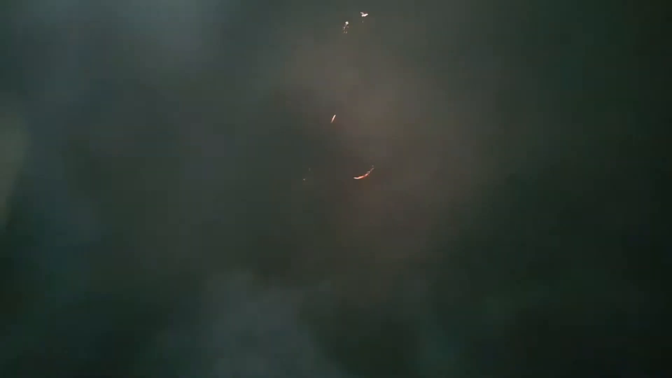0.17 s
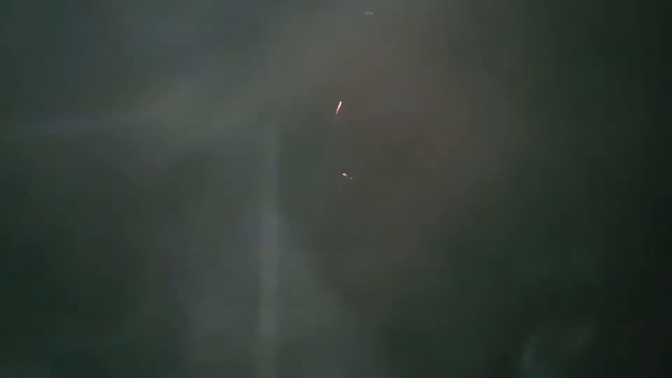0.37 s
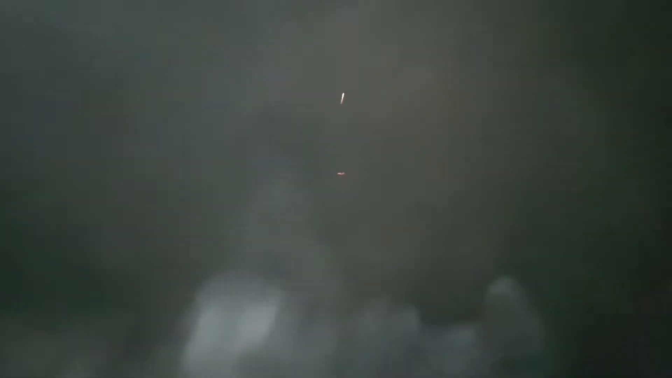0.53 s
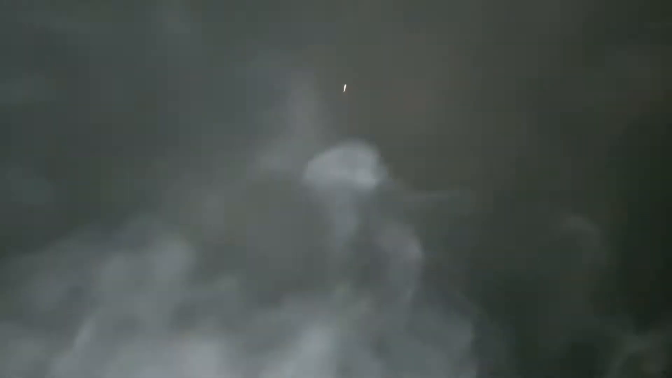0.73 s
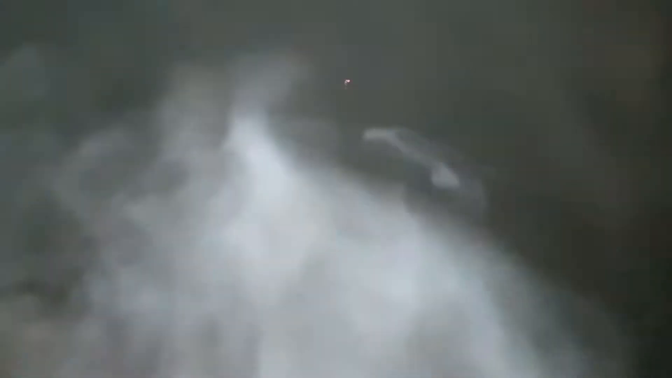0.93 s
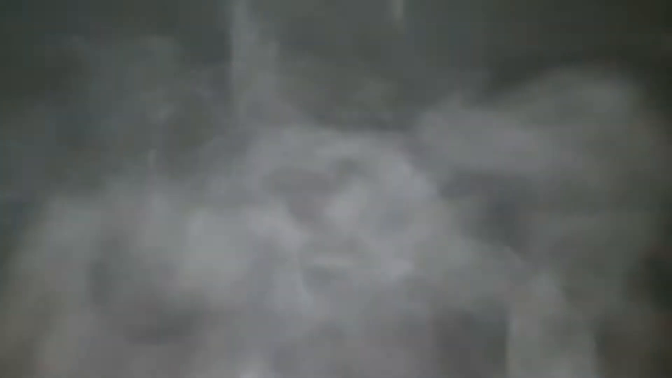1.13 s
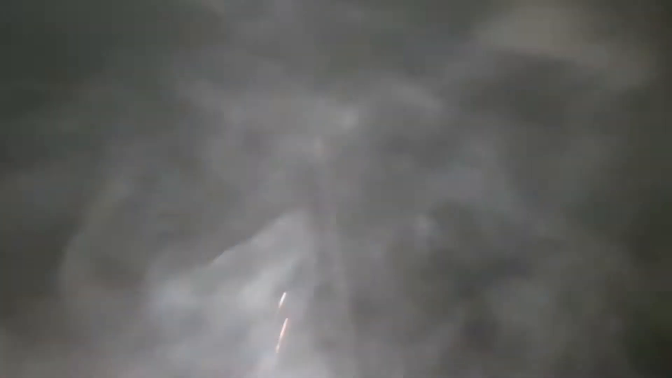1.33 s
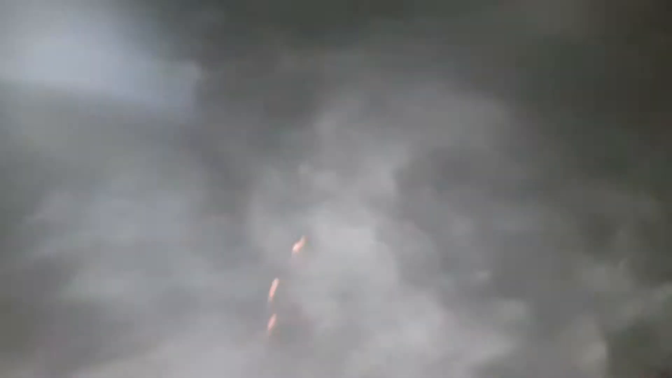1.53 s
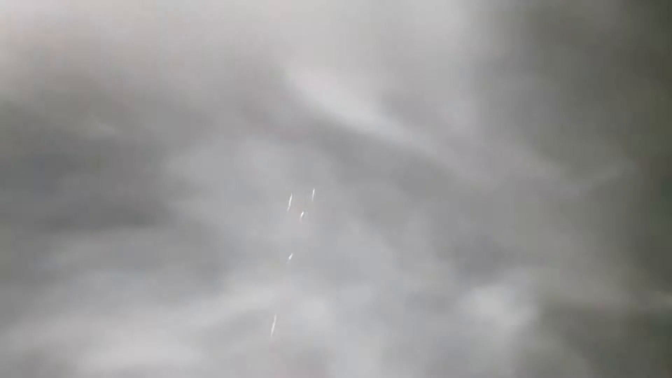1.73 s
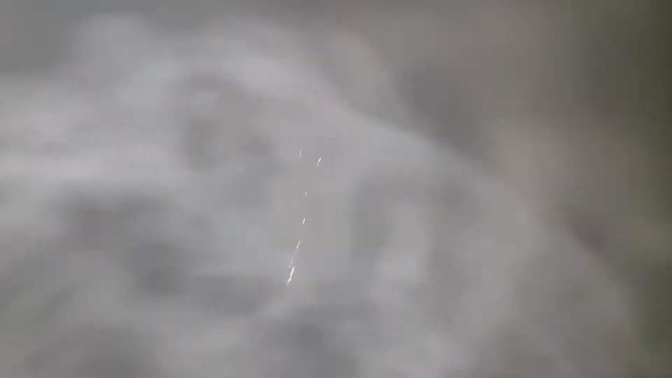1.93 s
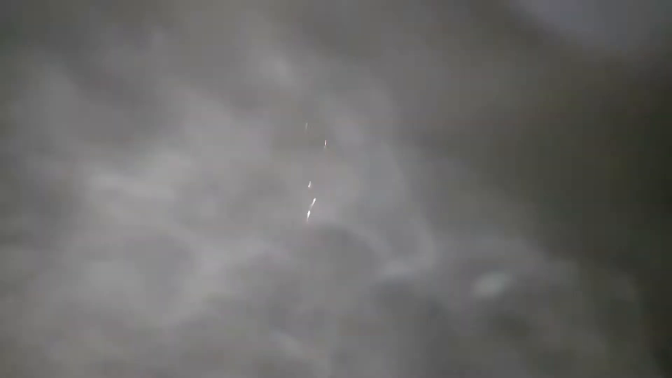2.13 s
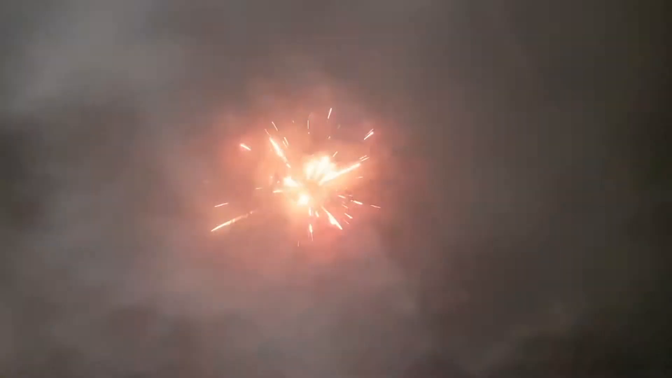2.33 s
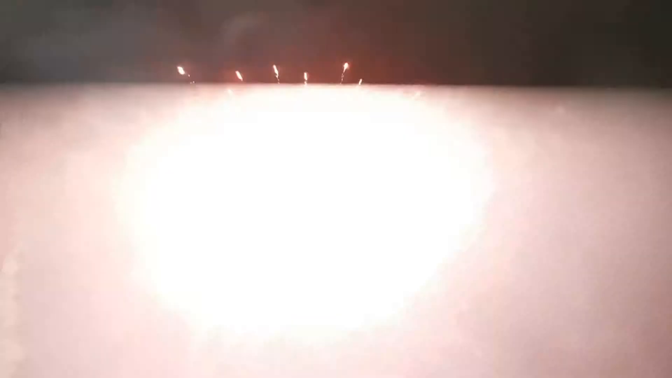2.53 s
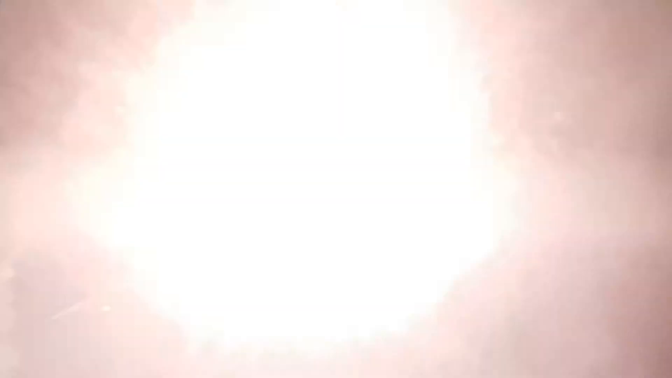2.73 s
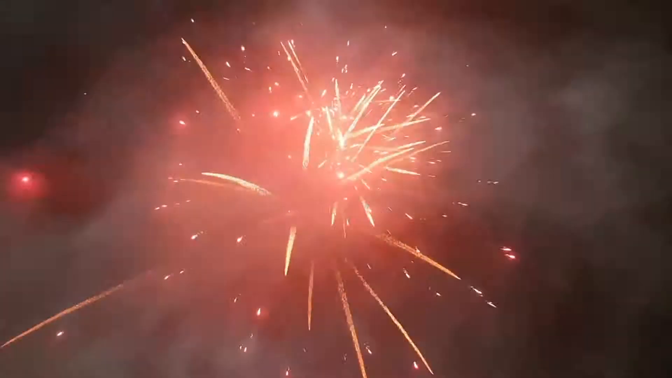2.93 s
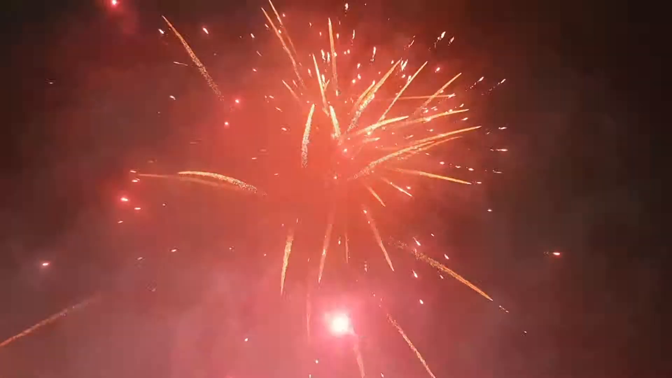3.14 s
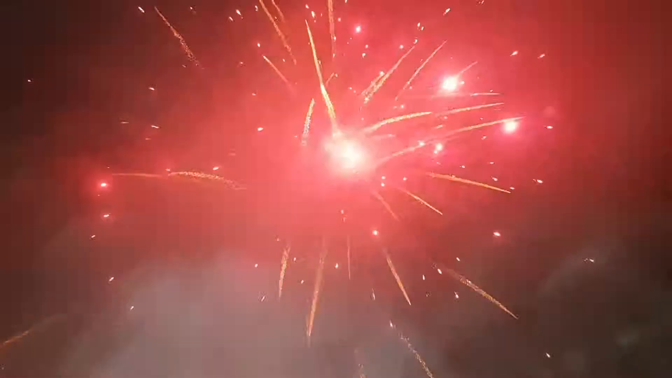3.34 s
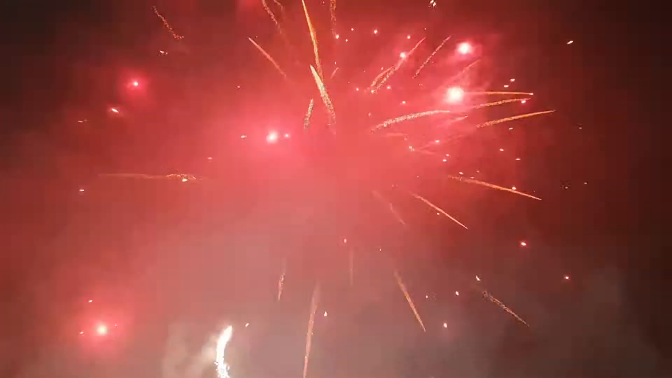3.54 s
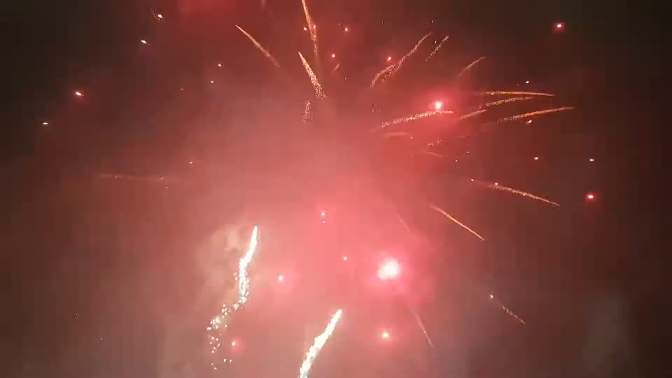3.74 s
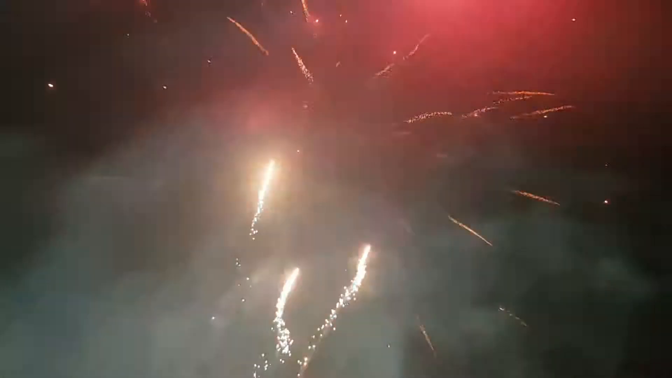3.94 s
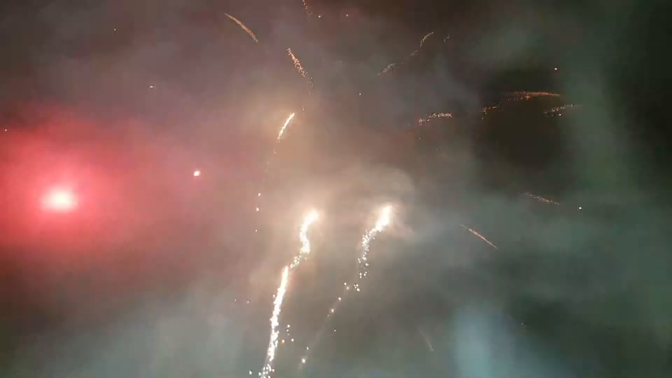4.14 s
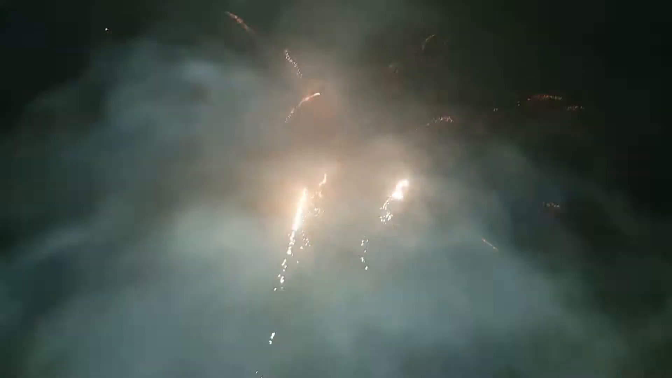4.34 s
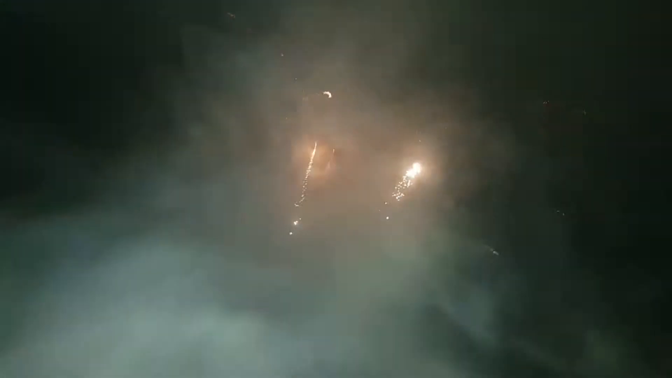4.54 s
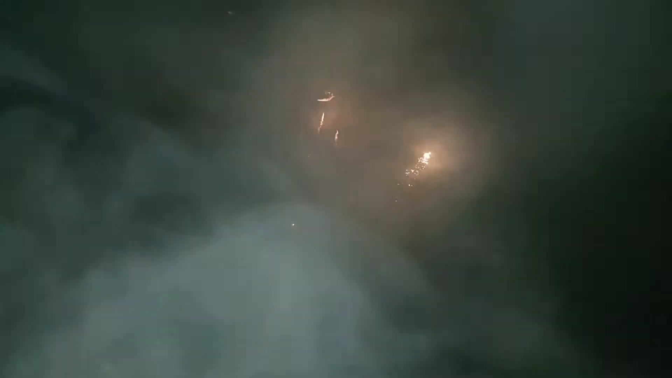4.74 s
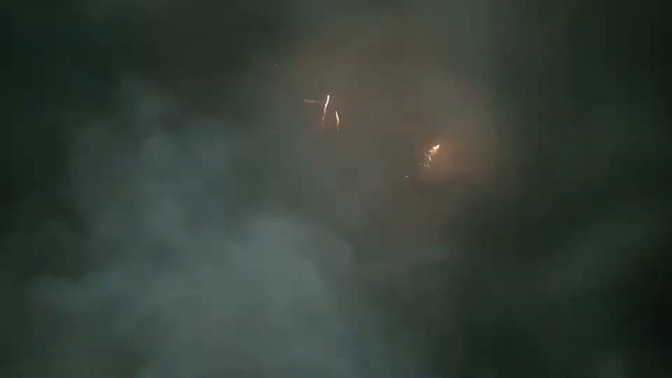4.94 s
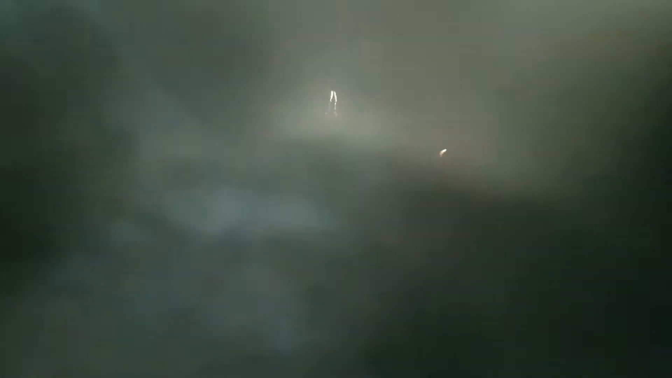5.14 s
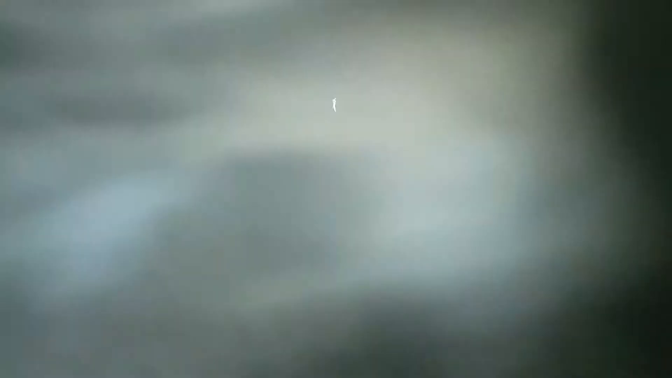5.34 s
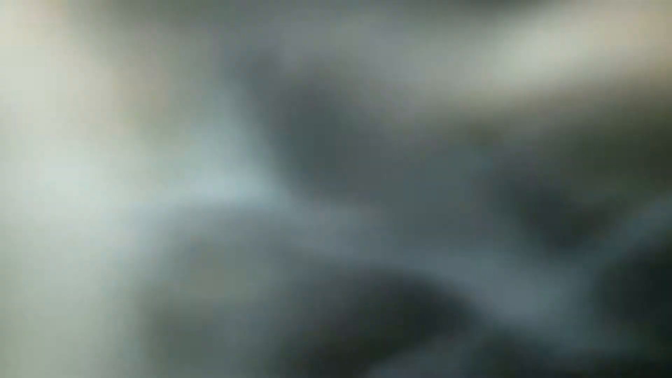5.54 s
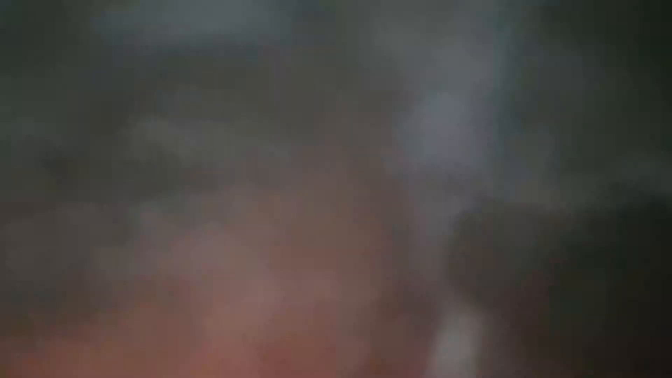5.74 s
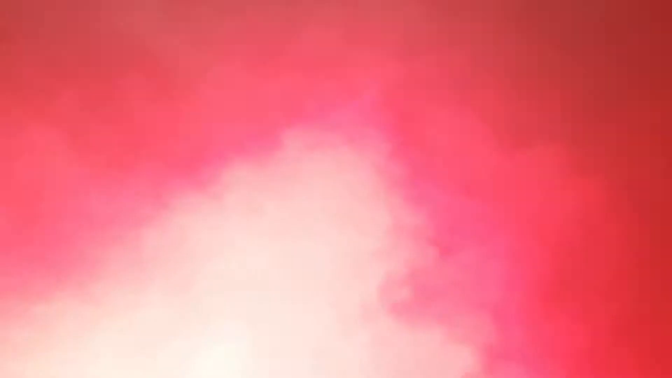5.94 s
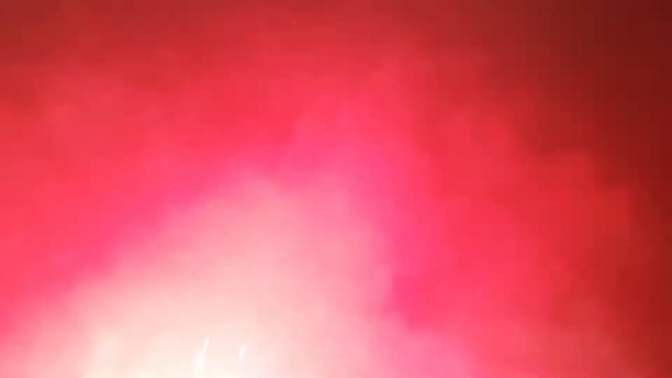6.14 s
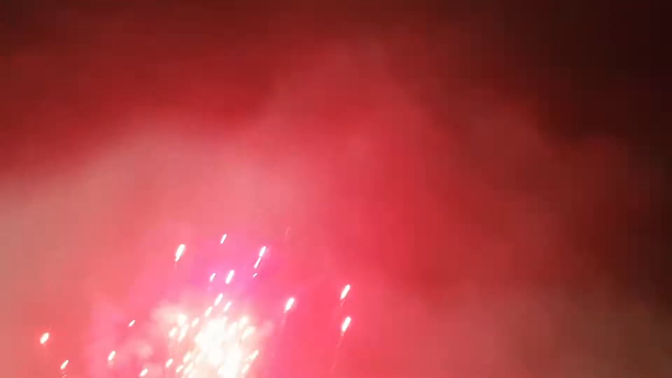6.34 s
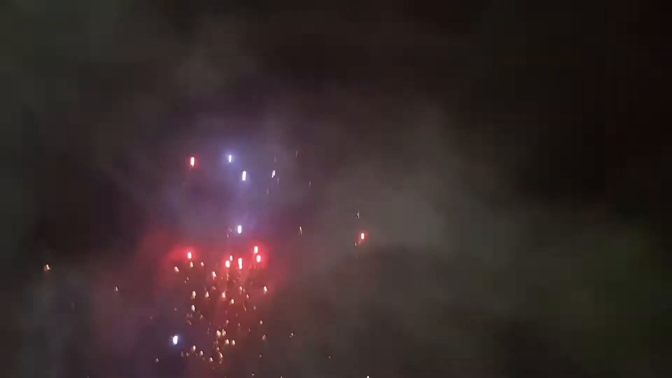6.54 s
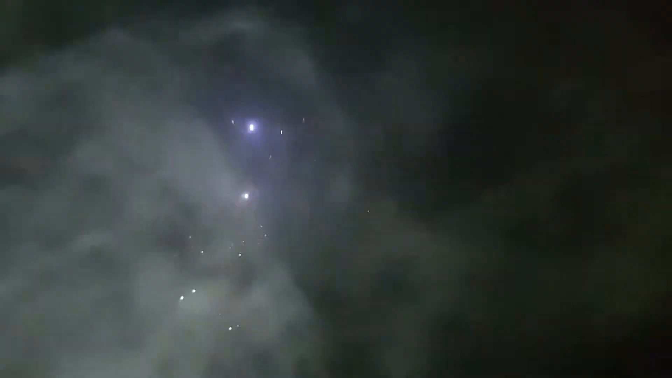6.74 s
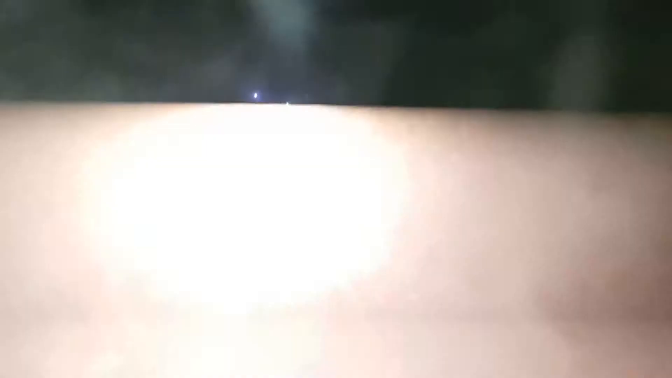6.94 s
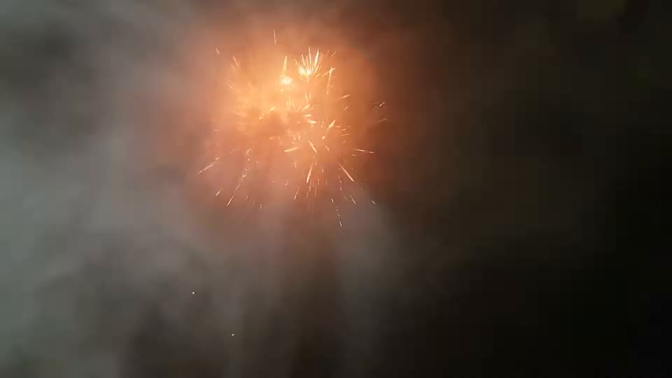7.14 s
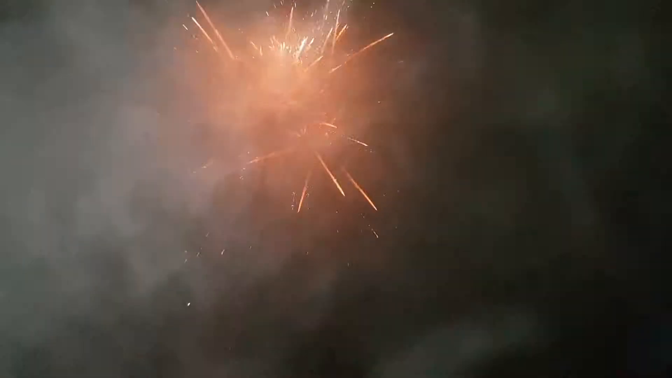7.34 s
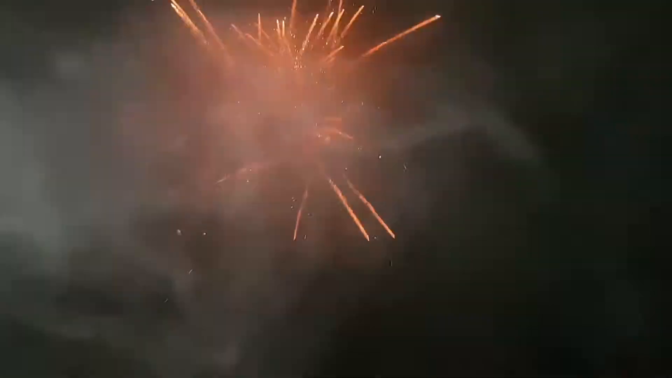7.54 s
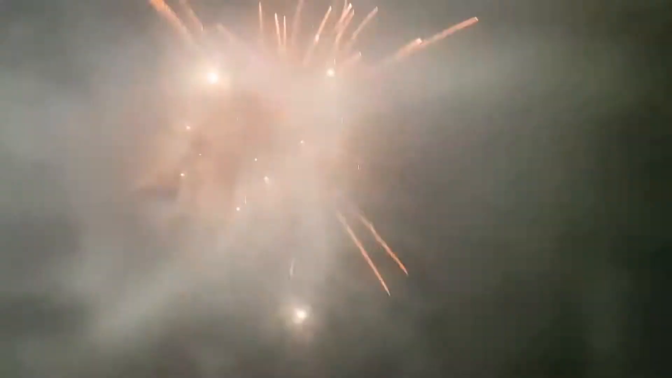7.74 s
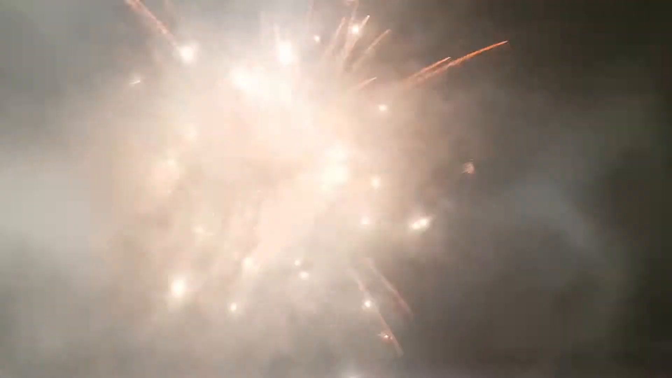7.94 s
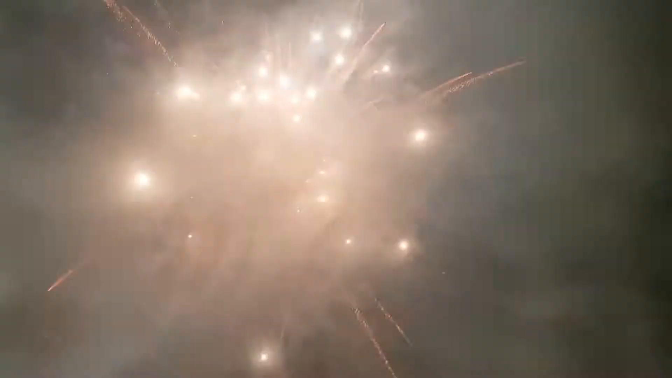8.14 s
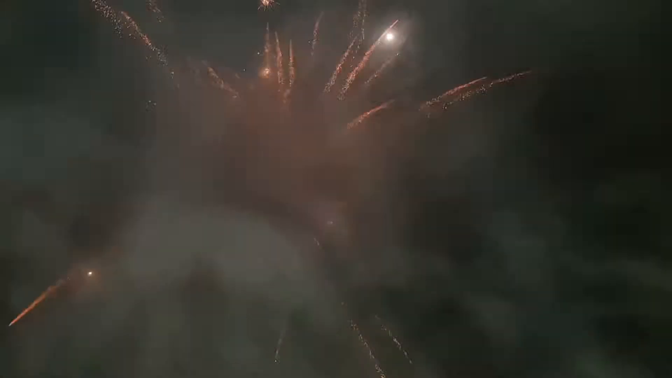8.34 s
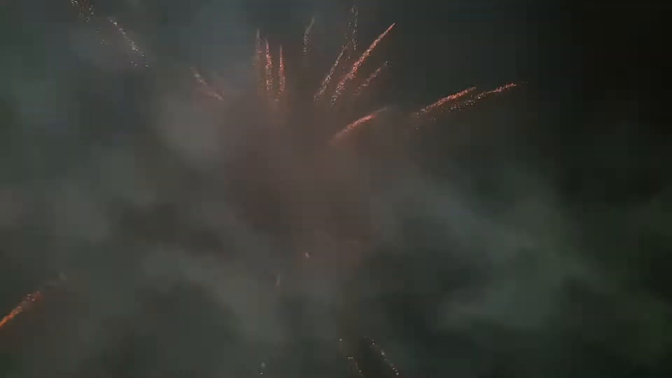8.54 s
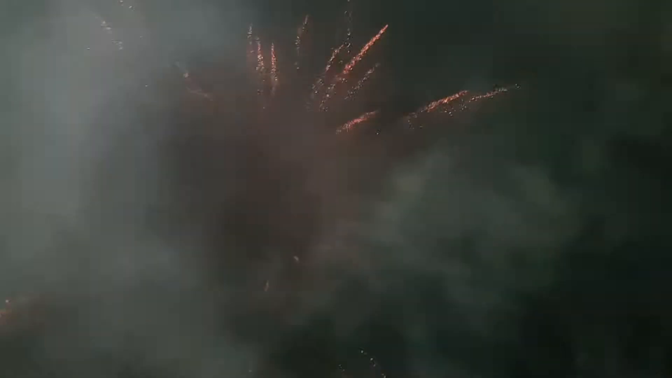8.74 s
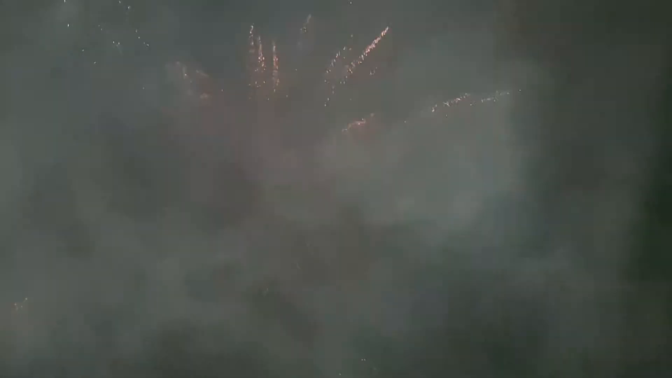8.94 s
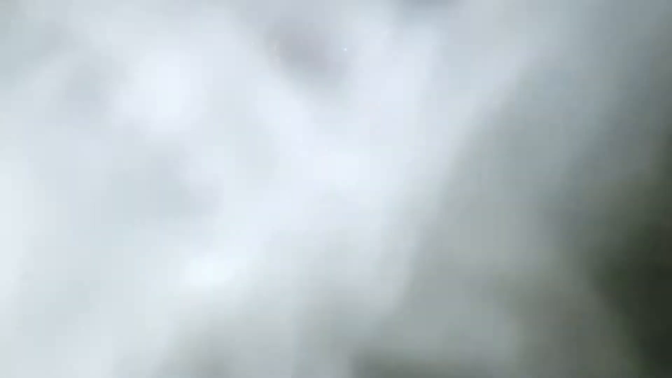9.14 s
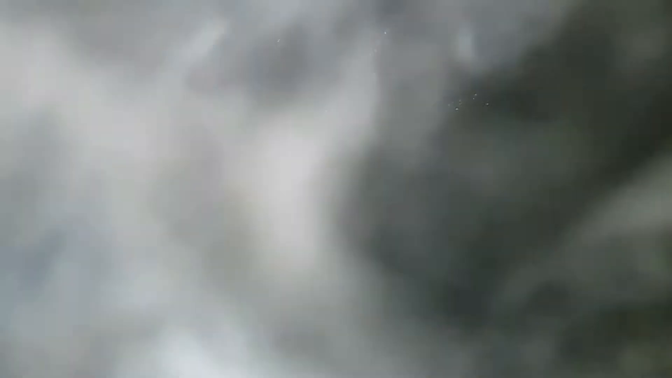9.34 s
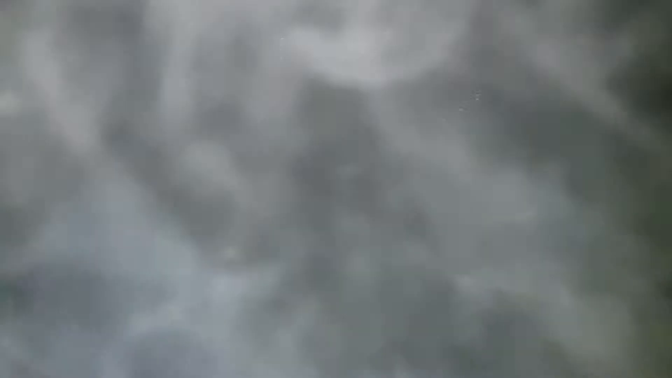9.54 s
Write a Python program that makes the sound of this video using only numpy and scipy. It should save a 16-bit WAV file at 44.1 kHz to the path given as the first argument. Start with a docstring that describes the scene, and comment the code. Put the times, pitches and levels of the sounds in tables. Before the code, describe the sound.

Outdoors at night, distant whistling fireworks sink in pitch before a nearby cake thumps out six shots. Shells crack sharply overhead, then new whistlers shriek upward and drop in pitch. A very rapid volley follows, then more loud bursts and a dense sizzling crackle. Reports overload the close microphone and roll around the neighbourhood, leaving faint hiss.

```python
"""Whistlers already in the air sink in pitch, then a firework cake fires close by, outdoors at night.
Tubes thump in volleys as pressure pulses with gas noise, shells burst overhead and slap back off the ground.
More whistlers climb away as harmonic tones with exhaust hiss, and a cloud of stars crackles as random pops.
The reports overload the microphone and roll away over the neighbourhood in decaying noise; a faint hiss remains."""
import sys
import numpy as np
from scipy import signal
from scipy.fft import rfft, irfft, next_fast_len
from scipy.io import wavfile
from scipy.ndimage import uniform_filter1d

SR = 44100
rng = np.random.default_rng(int(sys.argv[2]) if len(sys.argv) > 2 else 0)


def waveform_to_disk(signal):
    """Save audio, clipped to [-1, 1], as 16-bit WAV at the path in sys.argv[1]."""
    frames = np.transpose(np.atleast_2d(signal))
    scaled = np.clip(frames, -1, 1) * 32767
    samples = np.round(scaled).astype(np.int16)
    wavfile.write(sys.argv[1], SR, samples)


N = 426888
TIME = np.arange(N) / SR
RIGHT_LAG_S = 3 / SR   # extra travel time to the right microphone port

# Whistling tubes. Each row: lit in s, fuel spent in s, silent in s, first pitch in Hz before the swoop,
# pitch of the spent tube in Hz, pitch after the last bend in Hz, lateness of that bend (1 = even),
# dip of the dying note in Hz, level far away in dB, odd partials of the burnt-down tube in dB.
WHISTLER_COURSES = [(-1.23, .63, .92, 1540, 1208, 1240, .8, 0, -30.5, 2),
                    (-1.24, .24, .89, 1750, 1278, 1315, 2.5, 0, -31, -1),
                    (-1.27, -.09, 1.22, 1730, 1226, 1305, 1.6, 0, -34, -3),
                    (3.22, 4.97, 5.62, 1760, 1126, 1225, .45, 215, -28.5, -9),
                    (3.385, 4.75, 5.6, 1760, 1222, 1410, 1, 0, -33.5, -7),
                    (3.53, 5.0, 5.5, 1680, 1210, 1385, 3, 0, -31.5, -3),
                    (3.77, 4.78, 5.5, 1640, 1266, 1175, 1.4, 0, -30.5, 7)]
# Lift charges in the tubes, and one shell bursting low at 5.784 s that is sounded like them. # Each row: start
# in s, blast in dB, typical overpressure in ms, gas crack in dB, echo in dB (relative levels).
LIFT_CHARGES = [(0.8535, 1.5, 1.2, 1.5, 1), (0.9972, -1, 2.7, -7.5, -7), (1.0739, -2.5, 0.52, -6, -10.5),
                (1.219, -1, 0.69, -3, -6), (1.3688, 2, 0.55, -3.5, -8.5), (1.517, -2, 0.84, -0.5, -7.5),
                (3.1228, -6, 2.4, -3, -11.5), (3.1941, -5, 1.4, -7, -15.5), (3.3372, -5, 0.59, -10, -18.5),
                (3.495, -6, 0.41, -18, -19), (3.6129, -8, 0.63, -10.5, -21.5),
                (3.7496, -6, 0.73, -16, -18.5), (5.612, 1, 1.5, 0, 0.5), (5.6493, -1, 1.14, -5, -3),
                (5.6865, 2, 1.3, -6.5, -5), (5.7332, 1, 0.52, -9, -5.5), (5.7627, -2, 0.52, -6, -9),
                (5.784, -1, .5, -7, -8), (5.809, -4, 0.37, -9, -12), (5.8396, -3, 0.38, -5, -9.5),
                (5.8801, -6.5, 1.7, -4.5, -10.5)]
# Shells bursting overhead. Each row: start in s, blast in dB, typical overpressure in ms,
# crack in dB, echo in dB (relative levels).
SHELL_BURSTS = [(2.3325, 15.5, 0.45, 0.5, 1), (2.59, 13, 0.61, -2, 0.5), (2.7224, 12.5, 0.32, -5, -4),
                (2.9195, 5, 0.8, -4, -1), (2.9333, 12, 0.31, -8, -18), (3.0022, 14, 0.3, -4, -2),
                (7.111, 17, 0.42, 0.5, -0.5), (7.1363, 4, 1, -7, 1), (7.1802, 9, 0.48, -3, 0.5),
                (7.2571, 10, 0.47, -3.5, -6.5), (7.2819, 4.5, 0.65, -8, -4), (7.288, 7.5, 0.55, -10, -3.5),
                (7.5856, 12.5, 0.53, -2.5, 2), (7.8718, 15, 0.37, -11, -4.5), (8.042, 7, 0.56, -10, -5),
                (8.1641, 3, 1.1, -12, -11), (8.2864, 4.5, 1, -7.5, -5), (8.6721, 8, 0.4, -6.5, -1.5)]
# Spectrum of the scattered echoes from above. Each row: frequency in Hz, relative level in dB per Hz.
SKY_SCATTER_COLOUR = [(24, -58), (40, -10.5), (124, -8), (199, -3), (422, -1), (503, -3), (570, 1),
                      (873, -17), (1300, -14.5), (3560, -25.5), (4240, -26), (7360, -26), (8550, -37),
                      (13800, -24.5), (16000, -44)]
# Spectrum of the crackling stars. Each row: frequency in Hz, relative level in dB per Hz.
STAR_COLOUR = [(150, -11), (500, -2.5), (900, -0.5), (1300, 3.5), (2200, 0), (3500, 1.5), (7000, -5),
               (9000, -13.5), (13000, -12), (16000, -21)]


def from_db(db):
    """Logarithmic level: 20 dB is a tenfold amplitude."""
    return 10 ** (np.asarray(db) / 20)


def rms_one(x):
    """Normalisation: equal mean power, an rms of one over all channels."""
    return x / np.sqrt(np.mean(x ** 2) + 1e-20)


def at_hz(points, hz):
    """Logarithmic frequency axis: a table is interpolated as the ear spaces pitch."""
    points = np.array(points)
    return np.interp(np.log(np.maximum(hz, 1)), np.log(points[:, 0]), points[:, 1])


def in_time(rows):
    """Envelope: a smoothed gate open while the curve lasts, then each column interpolated over time."""
    s, *columns = np.transpose(rows)
    gate = uniform_filter1d(1. * ((TIME >= s[0]) & (TIME <= s[-1])), size=600)
    return [gate] + [np.interp(TIME, s, column) for column in columns]


def drift(rate):
    """Random modulation: smooth chance of spread one, with about rate new values a second."""
    knots = rng.standard_normal(20000)
    return rms_one(np.interp(TIME * rate, np.arange(len(knots)), knots))


def butter(x, hz, kind, order=2):
    """Causal low- or high-pass filtering with a maximally flat passband."""
    sections = signal.butter(order, min(hz, SR / 2 - 1), kind, fs=SR, output="sos")
    return signal.sosfilt(sections, x + 1e-18)


def coloured(x, colour):
    """Spectral shaping: a noise is weighted frequency by frequency, then brought to rms one."""
    length = x.shape[-1]
    size = next_fast_len(length)
    gain = from_db(at_hz(colour, np.fft.rfftfreq(size, 1 / SR)))
    return rms_one(irfft(rfft(x, size) * gain, size)[..., :length])


def air_noise(colour, size=N):
    """Spatial coherence: the two sides of a noise are alike in the bass and part in the treble."""
    # Each row: frequency in Hz, left-right correlation.
    likeness = [(50, .85), (200, 0.94), (500, 0.62), (1200, 0.17), (3000, 0.26), (12000, 0.048)]
    padded = next_fast_len(size)
    mid, side = rfft(rng.standard_normal((2, padded)))
    alike = np.clip(at_hz(likeness, np.fft.rfftfreq(padded, 1 / SR)), -1, 1)
    pair = np.sqrt(1 + alike) * mid + np.sqrt(1 - alike) * side * [[1], [-1]]
    return coloured(irfft(pair, padded)[:, :size], colour)


def panned(x, left_db):
    """Level difference between the sides: a positive one leans the sound to the left."""
    return x * from_db([[left_db / 2], [-left_db / 2]])


def add(track, s, sound):
    """Superposition: a sound is summed in from a given second."""
    start = int(np.clip(round(s * SR), 0, N - 1))
    track[:, start:start + sound.shape[-1]] += sound[..., :N - start]


def night():
    """Steady background: stationary coloured noise under the whole scene."""
    # Each row: frequency in Hz, relative level in dB per Hz.
    night_colour = [(24, -40), (40, -24), (81, -12.5), (127, -7.5), (163, -13.5), (194, -7), (516, -9),
                    (1040, -26), (5050, -23.5), (6650, -16), (8550, -34.5), (10700, -20), (16000, -25.5)]
    return from_db(-53.5) * air_noise(night_colour)


def flight(lit, spent, silent):
    """Distance: a whistler's age, time since its fuel ran out, nearness (1 when lit), and its gate."""
    attack_s, release_s, climb_s = .045, .025, .28
    age, coasting = np.maximum(TIME - lit, 0), np.maximum(TIME - spent, 0)
    attack = np.clip(age / attack_s, 0, 1) ** 2
    release = np.clip((silent - TIME) / release_s, 0, 1)
    return age, coasting, np.exp(-age / climb_s), attack * release


def whistle_pitch(lit, spent, silent, first_hz, lowest_hz, last_hz, lateness, dip_hz):
    """Pipe resonance: pitch falls as burning lengthens the open pipe; once spent, it bends and may dip."""
    swoop_hz, swoop_s = 330, .045   # the note starts sharp and drops onto its pitch
    dip_lead_s, dip_s = .09, .035   # the dip's time before silence, and its half-width
    burning = 1 / np.interp(TIME, [lit, spent], [1 / first_hz, 1 / lowest_hz])
    swoop = swoop_hz * np.exp(-np.maximum(TIME - lit, 0) / swoop_s)
    progress = np.interp(TIME, [spent, silent], [0, 1]) ** lateness
    bend = (last_hz - lowest_hz) * np.sin(np.pi / 2 * progress) ** 2
    dip = dip_hz * np.exp(-((TIME - silent + dip_lead_s) / dip_s) ** 2)
    return burning + swoop + bend - dip


def whistlers():
    """Harmonic series: burning tubes sing on their second partial; freshly lit, they flutter and shriek."""
    # Overtones of a tube. Each row: multiple of the pitch, relative level in dB.
    partials = [(1, -19), (2, 0), (3, -13), (4, -16), (5, -24), (6, -20), (7, -36), (8, -38), (9, -43)]
    near_db, spent_db_per_s2 = 15, 4.5   # boost near the ground; ever faster fading once spent
    out = np.zeros((2, N))
    for *course, own_db, own_odd_db in WHISTLER_COURSES:
        _, coasting, near, gate = flight(*course[:3])
        hz = whistle_pitch(*course)
        level_db = own_db + near_db * near - spent_db_per_s2 * coasting ** 2
        live = gate > 0
        fresh = np.clip((hz - 1480) / 250, 0, 1)   # a high pitch marks a fresh tube

        flutter = (.002 + .018 * fresh ** 2) * drift(70) + .002 * drift(6)
        rasp = (.005 + .017 * fresh) * drift(700)
        wavering_hz = (hz * (1 + flutter + rasp))[live]
        phase = 2 * np.pi * np.cumsum(wavering_hz) / SR + rng.uniform(0, 2 * np.pi)

        # the balance of odd and even partials wanders
        odd_db = own_odd_db * (1 - fresh[live]) + 2.0 * drift(7)[live]
        tone = 0
        for k, (_, db) in enumerate(partials, start=1):
            shrill_db = 1.3 * fresh[live] * max(k - 3, 0)
            tone = tone + from_db(db + shrill_db + odd_db * (k % 2)) * np.sin(k * phase)

        # turbulent air on the way to each side
        sway_db = 2.6 * drift(110) + 2.0 * np.array([drift(30), drift(30)])
        sway_db = sway_db + (2.2 + 1.5 * fresh) * drift(350) - 1.2 * fresh
        out[:, live] += np.sqrt(2) * tone * (gate * from_db(level_db + sway_db))[:, live]
    out[1] = np.interp(TIME - RIGHT_LAG_S, TIME, out[1])
    return panned(out, left_db=3.5)


def jets():
    """Jet noise: exhaust powers add to a hiss around the whistles, with spitting while a tube is low."""
    # Spectra of exhaust and spitting. Each row: frequency in Hz, relative level in dB per Hz.
    jet_colour = [(200, -39.5), (600, -15), (900, -22), (1500, -10), (2200, -8), (2700, 2.5), (3200, -0.5),
                  (3700, -7.5), (4500, -11), (7300, -17), (8600, -27.5), (15000, -42)]
    spit_colour = [(2500, -32), (4200, 13), (6000, -5.5), (7500, 2.5), (10000, -6), (15000, -10)]
    jet_db, near_db, spent_db_per_s = -37.7, 4, 7   # far level, boost when near, fading once spent
    spit_db, spit_s = -28, .45
    flow_power, spit_power = 0, 0
    for lit, spent, silent, *_ in WHISTLER_COURSES:
        age, coasting, near, gate = flight(lit, spent, silent)
        flow_db = jet_db + near_db * near - spent_db_per_s * coasting
        flow_power += (gate * from_db(flow_db)) ** 2
        spit_power += (gate * from_db(spit_db) * np.exp(-(age / spit_s) ** 2)) ** 2
    flow = np.sqrt(flow_power) * air_noise(jet_colour)
    spit = np.sqrt(spit_power) * air_noise(spit_colour)
    return panned(flow + spit, left_db=3.5)


def off_the_walls(x, wet_db, t60):
    """Multipath interference: near reflections smear a gliding note and make it beat with itself."""
    t = TIME[:SR // 5]
    decaying = rng.standard_normal((2, len(t))) * from_db(-60 * t / t60)
    response = rms_one(decaying) / np.sqrt(len(t))
    return x + from_db(wet_db) * signal.fftconvolve(x, response, axes=1)[:, :N]


def fuse():
    """Combustion noise: a thin hiss swells as the fuse burns along the cake."""
    # Each row: start in s, end in s, level in dB before panning.
    fuse_burns = [(.5, .86, -54), (5.08, 5.62, -52), (8.95, 9.7, -59)]
    # Each row: frequency in Hz, relative level in dB per Hz.
    fuse_colour = [(2000, -14), (6500, -2), (8600, -9), (10500, 0), (16000, -2)]
    swell_s = .2
    burning = 0
    for start, end, level_db in fuse_burns:
        swell = np.clip((TIME - start) / swell_s, 0, 1)
        burning = burning + from_db(level_db) * swell * (TIME < end)
    return panned(burning * air_noise(fuse_colour), left_db=2.5)


def blast(t, push_ms, suction):
    """Blast wave: a shock front, a short overpressure, then the longer suction that returns the air."""
    u = t * 1000 / max(push_ms, .05)   # 1 where the overpressure ends
    return (1 - u) * np.exp(-u) * (1 + suction * np.minimum(u, 2) / 2)


def pressure_pulse(t, push_ms, suction, bass_hz, spread):
    """Arrival-time difference: the blast meets the left port first and drives each a little differently."""
    push = push_ms * np.exp(spread * rng.standard_normal(2))
    late = t - RIGHT_LAG_S
    left = blast(t, push[0], suction)
    right = (late >= 0) * blast(np.abs(late), push[1], suction)
    ports = np.array([left, right])
    near_1khz = signal.lfilter(*signal.iirpeak(980, 2.5, fs=SR), ports)
    return butter(ports - 0.77 * near_1khz, bass_hz, "high")   # hollow near one kilohertz


def scatter(t, colour, rise_s, t60):
    """Diffuse reflection: echoes from nearby walls, fences and trees swell, then die exponentially."""
    envelope = (1 - np.exp(-(t / rise_s) ** 2)) * from_db(-60 * t / t60)
    return air_noise(colour, size=len(t)) * envelope


def yard(t):
    """Modal resonance: low modes between the walls build up over the first few reflections, then die."""
    # Each row: frequency in Hz, relative level in dB, t60 in s.
    yard_modes = [(131, -19.5, 0.12), (186, -5, 0.081), (366.3, -30, 0.077)]
    modes = 0
    for hz, db, t60 in yard_modes:
        modes = modes + from_db(db - 60 * t / t60) * np.sin(2 * np.pi * (hz * t + rng.random()))
    return modes * (1 - np.exp(-(t / 0.0073) ** 2))


def launches():
    """Impulsive source: each tube gives a thump and a spray of gas noise; the yard answers with a boom."""
    # Spectra of gas and echoes. Each row: frequency in Hz, relative level in dB per Hz.
    gas_colour = [(100, -5.5), (500, 1.5), (1200, -8), (3000, 1.5), (5000, -9), (8000, -10), (12000, -8.5),
                  (16000, -16)]
    echo_colour = [(24, -45.5), (40, -21), (140, 1.5), (215, -3.5), (402, -1.5), (990, -22), (2260, -18.5),
                   (2500, -19), (2910, -19.5), (4130, -17), (5310, -25), (7540, -23), (8770, -32),
                   (13400, -22.5), (16000, -47.5)]
    out, t = np.zeros((2, N)), TIME[:SR // 3]
    for s, blast_db, push_ms, crack_db, echo_db in LIFT_CHARGES:
        thump = from_db(blast_db) * pressure_pulse(t, push_ms, suction=1.8, bass_hz=66, spread=0.14)
        spray = 0.96 * np.exp(-t / 0.00024) + 0.31 * np.exp(-t / 0.0071)
        gas = from_db(crack_db) * air_noise(gas_colour, size=len(t)) * spray
        echoes = from_db(-11.5) * scatter(t, echo_colour, rise_s=0.013, t60=0.37)
        boom = from_db(echo_db) * (echoes + yard(t))
        add(out, s, thump + panned(gas, left_db=4.5) + boom)
    return out


def rumbles():
    """Low-frequency noise: each report brings a short rumble, independent on the two sides, soon gone."""
    # Each row: frequency in Hz, relative level in dB per Hz.
    rumble_colour = [(20, -2), (60, 0), (110, -6), (300, -30), (1000, -70)]
    rumble_db, decay_s = -25, .02   # level relative to the report's echo setting
    out, t = np.zeros((2, N)), TIME[:SR // 5]
    for s, *_, echo_db in list(LIFT_CHARGES) + list(SHELL_BURSTS):
        rumble = coloured(rng.standard_normal((2, len(t))), rumble_colour)
        add(out, s, from_db(rumble_db + echo_db) * rumble * np.exp(-t / decay_s))
    return out


def neighbourhood(x):
    """Reverberation: countless far echoes roll on for seconds, decaying fastest in the treble."""
    # Spectrum of the roll. Each row: frequency in Hz, relative level in dB per Hz.
    roll_colour = [(24, -50), (40, -23), (71, -11), (237, -3.5), (422, -3), (516, -2), (570, -4),
                   (990, -9.5), (1480, -10), (2100, -12.5), (3220, -11.5), (5000, -17.5), (8340, -21),
                   (13800, -24.5), (16000, -45.5)]
    # Decay by band. Each row: centre frequency in Hz, t60 in s.
    roll_decay = [(100, 2.87), (500, 2.03), (2000, 2.15), (5000, 1.42), (12000, 0.68)]
    t = TIME[:2 * SR]
    noise = rfft(air_noise(roll_colour, size=len(t)))
    hz = np.fft.rfftfreq(len(t), 1 / SR)
    centres = np.transpose(roll_decay)[0]
    response = 0
    for share, (_, t60) in zip(np.eye(len(centres)), roll_decay):
        band = irfft(noise * at_hz(np.c_[centres, share], hz))   # overlapping bands that sum to the whole
        response = response + band * from_db(-60 * t / t60)
    response = rms_one(response * (1 - np.exp(-t / 0.039))) / np.sqrt(len(t))
    return signal.fftconvolve(x, response, axes=1)[:, :N]


def rolling_echo():
    """Impulse response: reports set the neighbourhood rolling, bursts above most; thuds come from far off."""
    # Dull far-off thuds. Each row: start in s, level in dB before filtering.
    far_thuds = [(1.775, -35), (9.09, -23), (9.175, -22), (9.667, -29)]
    kicks, thuds, t = np.zeros((2, N)), np.zeros((2, N)), TIME[:SR // 3]
    for shots, reach_db in ((LIFT_CHARGES, 5.5), (SHELL_BURSTS, 8.5)):
        for s, *_, echo_db in shots:
            add(kicks, s, from_db([echo_db + reach_db]))
    for s, level_db in far_thuds:
        add(thuds, s, from_db(level_db) * scatter(t, SKY_SCATTER_COLOUR, rise_s=0.0077, t60=.09))
    return neighbourhood(kicks) + butter(butter(thuds, 2500, "low"), 160, "high")


def bursts():
    """Ground reflection: a report from above arrives twice, the second time with its scattered echoes."""
    # Each row: frequency in Hz, relative level in dB per Hz.
    crack_colour = [(100, -9), (550, 4.5), (950, 2), (1500, -5.5), (3000, -5.5), (5000, -7), (8000, -14),
                    (12000, -16.5), (16000, -13.5)]
    ground_delay_s = .0115
    out, t = np.zeros((2, N)), TIME[:SR // 3]
    for s, blast_db, push_ms, crack_db, echo_db in SHELL_BURSTS:
        shock = from_db(blast_db) * pressure_pulse(t, push_ms, suction=0.42, bass_hz=114, spread=0.21)
        tearing = 1.5 * np.exp(-t / 0.00058) + 0.35 * np.exp(-t / 0.0053)
        crack = from_db(crack_db) * air_noise(crack_colour, size=len(t)) * tearing
        crack = panned(crack, left_db=4.5)
        slap = 0.64 * butter(shock, 7100, "low", order=1) + 0.43 * crack
        echoes = from_db(echo_db - 13.0) * scatter(t, SKY_SCATTER_COLOUR, rise_s=0.0029, t60=.25)
        add(out, s, shock + crack)
        add(out, s + ground_delay_s, slap + echoes)
    return out


def whizzes():
    """Rotation tone: a spinning fragment off a burst slows down, so its note drops."""
    # Each row: start in s, length in s, level in dB.
    fragments = [(2.434, .078, -26.5), (2.685, .06, -30), (2.82, .07, -35.5), (3.02, .05, -35.5),
                 (3.1, .035, -41.5)]
    first_hz, halving_s = 1980, .22   # time in which the pitch would halve
    out = np.zeros((2, N))
    for s, length, level_db in fragments:
        age = TIME[:int(length * SR)]
        phase = 2 * np.pi * np.cumsum(first_hz / (1 + age / halving_s)) / SR
        swell = signal.windows.tukey(len(age), .25) * (1 + age / length) / 2
        add(out, s, from_db(level_db) * swell * (np.sin(phase) + .18 * np.sin(2 * phase)))
    return out


def flare():
    """Combustion noise: a fan of burning stars hisses softly as it rises from the tubes."""
    # Each row: time in s, level in dB before panning.
    flare_levels = [(5.9, -52), (6.05, -42.5), (6.2, -48), (6.45, -54), (6.7, -70)]
    # Each row: frequency in Hz, relative level in dB per Hz.
    flare_colour = [(300, -9), (1200, -1), (3200, 0.5), (5500, -10), (9000, -14), (15000, -15)]
    gate, level_db = in_time(flare_levels)
    return panned(gate * from_db(level_db) * air_noise(flare_colour), left_db=9)


def crackle():
    """Poisson process: hundreds of tiny stars pop, sparsely at first, then as a dense sizzle."""
    # the fuses run out around one moment
    peak_s, spread_s, shape = 8.2, .25, 2.4
    peak_db, fall_db, peak_pops_per_s = -22.7, 5.5, 1600   # fall_db is the loss one spread away
    off_peak = np.minimum(np.abs((TIME - peak_s) / spread_s) ** shape, 20)
    level_db = peak_db - fall_db * off_peak
    per_s = np.maximum(peak_pops_per_s * np.exp(-off_peak), 70)
    strength = from_db(2.2 * np.minimum(rng.exponential(1, N), 4))
    # the last factor keeps the mean power independent of the rate
    pops = (rng.random(N) < per_s / SR) * strength * np.sqrt(SR / per_s)
    # each pop from its own direction: the right side lags or leads by a few samples
    lags = rng.integers(-4, 5, N)
    right = np.bincount(np.clip(np.arange(N) + lags, 0, N - 1), pops, N)
    pops = np.array([pops, right])
    t = TIME[:SR // 30]
    clutter = 0.035 * rng.standard_normal((2, len(t))) * np.exp(-t / 0.0053)
    sizzle = pops + signal.fftconvolve(pops, clutter, axes=1)[:, :N]
    return panned(from_db(level_db) * coloured(sizzle, STAR_COLOUR), left_db=3.5)


def snaps():
    """Impulse noise: a near star goes off with one dry snap, a noise burst decaying within milliseconds."""
    # The loudest single stars. Each row: start in s, relative level in dB.
    single_stars = [(7.81, -18), (7.826, -14), (7.848, -15), (8.473, -12), (8.524, -17), (8.552, -14),
                    (8.562, -12), (8.58, -9), (8.584, -15), (8.592, -13)]
    out, t = np.zeros((2, N)), TIME[:SR // 30]
    for s, level_db in single_stars:
        snap = air_noise(STAR_COLOUR, size=len(t)) * np.exp(-t / 0.00068)
        add(out, s, from_db(level_db - 5.5) * snap)
    return panned(out, left_db=4.0)


def scene():
    """Superposition of all the fireworks, their echoes and the still night."""
    whistle = off_the_walls(whistlers() + whizzes(), wet_db=-3.5, t60=0.15)
    stars = crackle() + snaps()
    distance = rolling_echo() + from_db(-10.0) * neighbourhood(stars) + night()
    reports = launches() + bursts() + rumbles()
    hisses = jets() + fuse() + flare()
    return reports + whistle + hisses + stars + panned(distance, left_db=2.2)


def record(dry):
    """Saturation: the microphone overloads on loud reports; a steep low-pass then cuts the top."""
    cutoff_hz = 16000
    overloaded = .92 * np.tanh(dry / 0.87)
    return signal.sosfilt(signal.ellip(12, .2, 90, cutoff_hz, fs=SR, output="sos"), overloaded)


dry = scene()
out = record(dry)
waveform_to_disk(out)
```